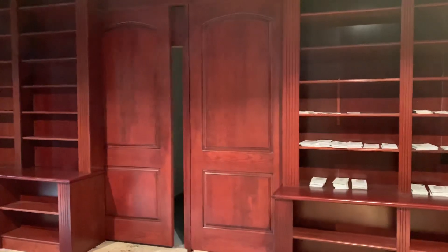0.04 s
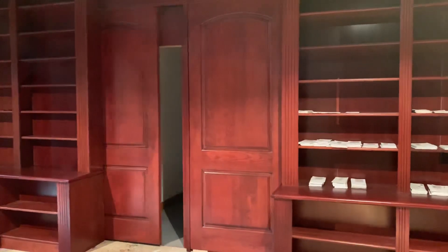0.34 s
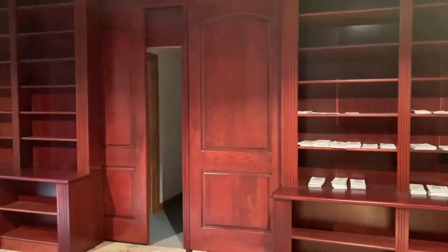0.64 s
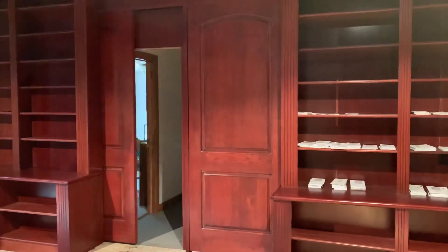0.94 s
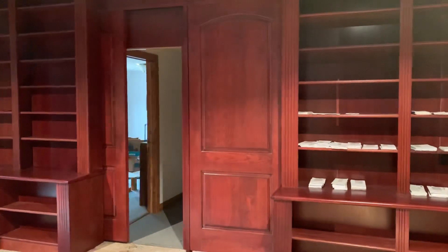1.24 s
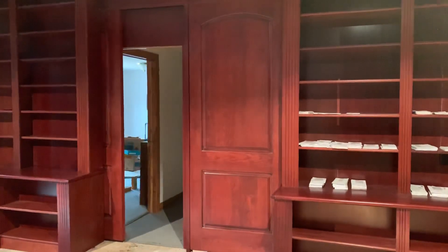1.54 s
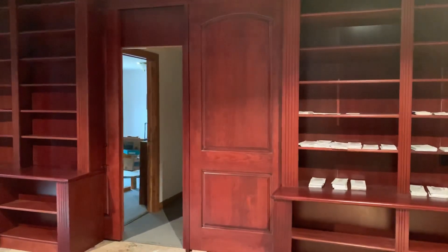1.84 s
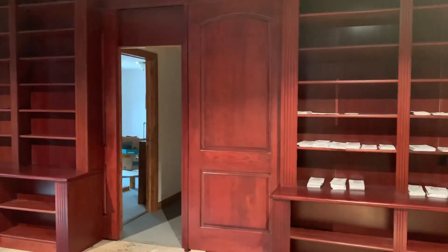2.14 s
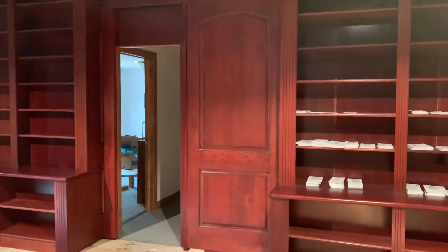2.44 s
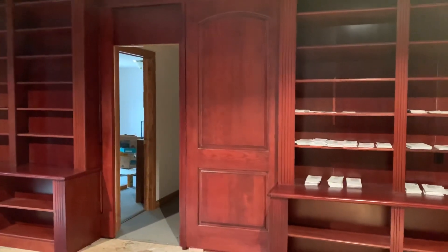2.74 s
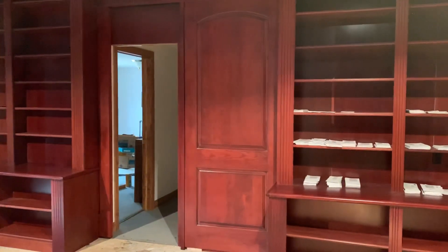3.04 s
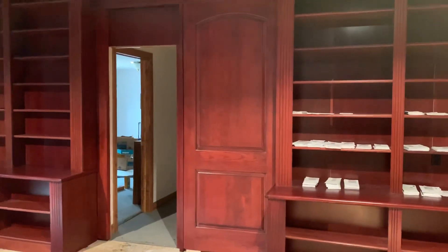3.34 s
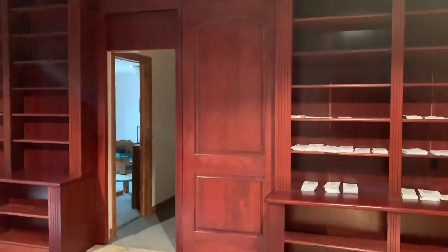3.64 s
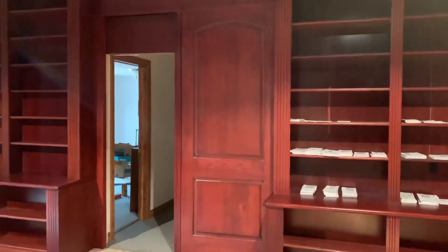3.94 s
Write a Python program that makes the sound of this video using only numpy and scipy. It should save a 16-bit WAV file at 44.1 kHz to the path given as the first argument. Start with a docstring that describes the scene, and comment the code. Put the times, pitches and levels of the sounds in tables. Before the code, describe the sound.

Indoors, a wooden door rolls open on a growling motor, with small bumps and a light scrape. The movement fades into a faint hum and moving air, and a soft thud with a slight rustle comes near the end.

```python
"""A motor slides a wooden door into its pocket in a panelled room. From the start the drive makes
the door and its cavity drone, while the rollers rush and jolt along the track and the door scrapes
its guide. It slows and stops after 1.7 s, leaving ventilation, mains hum and a thin hiss.
A faint rustle at 3.2 s leads into one soft thud at 3.4 s, like a footfall, and trails off after it."""
import sys
import numpy as np
from scipy import signal
from scipy.fft import rfft, irfft
from scipy.io import wavfile
from scipy.ndimage import uniform_filter1d

SR = 44100
rng = np.random.default_rng(int(sys.argv[2]) if len(sys.argv) > 2 else 0)


def wav_out(sig):
    """Save sig, one row per channel (or a flat mono array), as 16-bit PCM at SR to the path in sys.argv[1]."""
    wavfile.write(sys.argv[1], SR, np.round(np.clip(np.atleast_2d(sig).T, -1, 1) * 32767).astype(np.int16))


N = 176400
T, HZ = np.arange(N) / SR, np.fft.rfftfreq(N, 1 / SR)


def drive():
    """The motor growls under its load and shakes the door panel and the cavity behind it."""
    # drone, swelling with the load and dying as the door slows (time [s], level [dB], pitch [Hz])
    drone_curve = [(0, -27, 70.7), (.045, -26.5, 73), (.12, -37.5, 78), (.21, -29, 77.6),
                   (0.319, -35.5, 79.34), (.39, -28, 79.4), (0.471, -27, 86.5), (.52, -43.5, 90.6),
                   (.59, -39.5, 83), (0.669, -27, 82.1), (0.711, -34.5, 78.9), (.77, -29.5, 80),
                   (.81, -43.5, 82.7), (.88, -32, 85.2), (.96, -39, 83.9), (1.01, -31.5, 81.5),
                   (1.13, -43, 84.2), (1.2, -35.5, 83.4), (1.27, -48, 83), (1.33, -42.5, 82.7),
                   (1.41, -34, 87), (1.46, -48.5, 85.5), (1.51, -41, 86.2), (1.66, -45.5, 82),
                   (1.72, -68, 79), (1.8, -100, 78)]
    # resonances of door and cavity (pitch [Hz], width [Hz], relative level [dB], left lead [rad])
    cavity_modes = [(31.8, 6.3, -16.5, 0.52), (64, 8.4, -6, 1), (89, 9.2, -4, 0.84), (101, 11, -4.5, 0.41)]
    # the panel's boom, surging as the door gathers speed (time [s], level [dB])
    boom_curve = [(0, -24.5), (.075, -61), (.135, -44), (.19, -42), (.235, -38), (.3, -41.5), (.355, -28.5),
                  (.41, -42), (.45, -32), (.5, -28.5), (.54, -38.5), (.6, -34), (.71, -36), (.85, -35),
                  (.92, -31.5), (1.01, -45.5), (1.09, -37.5), (1.16, -36.5), (1.24, -52), (1.31, -37),
                  (1.42, -41.5), (1.6, -56), (1.8, -100)]
    # panel resonance (pitch [Hz], width [Hz], relative level [dB], left lead [rad])
    panel_modes = [(123.4, 13, 0, 1.5)]
    # the motor's growl (time [s], level [dB])
    growl_curve = [(0, -37), (.25, -33), (.34, -37), (.7, -40.5), (.95, -36.5), (1.2, -34), (1.4, -41),
                   (1.58, -53.5), (1.7, -67), (1.8, -100)]
    # motor resonances (pitch [Hz], width [Hz], relative level [dB], left lead [rad])
    growl_modes = [(155.3, 8.8, -5.5, 2.15), (180, 35, -5.5, 2.36), (191.8, 41, -6, 2.16),
                   (213, 14, -18.5, 4.8)]
    waver_hz, left_db, left_lead_rad = 3.2, -3.5, 0.55
    times, db, hz = np.transpose(drone_curve)
    pitch = np.interp(T, times, hz) + waver_hz * wander(N, size=1200)
    phase = 2 * np.pi * np.cumsum(pitch) / SR
    tone = unit(np.array([amp(left_db) * np.sin(phase + left_lead_rad), np.sin(phase)]))
    cavity = unit(ringing(cavity_modes, left_db=left_db))
    drone = amp(np.interp(T, times, db)) * (amp(-1.5) * tone + amp(-8.5) * cavity)
    boom = level(boom_curve) * ringing(panel_modes, steady=0.41)
    growl = level(growl_curve) * ringing(growl_modes, steady=0.67, left_db=-2.5)
    return drone + boom + growl


def rollers():
    """Wheels rush and rattle along the ringing track."""
    # rolling envelope (time [s], level [dB])
    roll_curve = [(0, -37.5), (.18, -35.5), (.4, -36.5), (.65, -34.5), (.95, -36.5), (1.18, -40),
                  (1.3, -45.5), (1.45, -54), (1.68, -64), (1.8, -100)]
    # rolling colour in the centre (frequency [Hz], relative level [dB])
    mid_colour = [(120, -33), (200, -6), (222, -5.5), (285, -1.5), (370, -1.5), (509, -6.5), (734, -6.5),
                  (832, -8.5), (1070, -14.5), (1180, -11.5), (1300, -20), (1780, -22), (3050, -41),
                  (3960, -63.5), (6710, -120)]
    # rolling colour at the sides (frequency [Hz], relative level [dB])
    side_colour = [(110, -24.5), (180, -7.5), (207, -1.5), (318, -14.5), (443, -16), (574, -15.5),
                   (737, -15.5), (922, -19.5), (1430, -24), (1630, -26.5), (2740, -41.5), (3050, -47),
                   (3960, -79.5), (6710, -120)]
    # track resonances (pitch [Hz], width [Hz], relative level [dB], left lead [rad])
    track_modes = [(263, 12, -15, -1.5), (295, 7, -13, 0), (327, 9, -13, 0), (361, 9, -15, .2),
                   (392, 16, -17, .2), (536, 6, -20, 0), (684, 6, -18, .3), (721, 4, -14.5, .4),
                   (1151, 10, -23, .5), (1210, 14, -27, .5), (1336, 6, -30, 1), (1765, 6, -28, 2),
                   (2725, 6, -39, 2), (4199, 6, -48, 1), (4312, 6, -50, 1)]
    wheels = rattle(rush(mid_colour, side_colour, side_db=-1, ripple_db=1.5))
    track = ringing(track_modes, steady=0.1)
    return (amp(1) * wheels + amp(-1) * track) * level(roll_curve) * balance(-1.5, -2.6)


def rattle(x, depth_db=2.0):
    """Uneven wheels stir one wooden resonance after another: patches about 150 Hz wide, 80 ms long."""
    spectrum = signal.stft(x, nperseg=1024, noverlap=768)[2]
    patches = uniform_filter1d(rng.standard_normal(spectrum.shape), size=4, axis=1)
    patches = unit(uniform_filter1d(patches[0], size=14, axis=1))  # one pattern for both channels
    return signal.istft(spectrum * amp(depth_db * patches), nperseg=1024, noverlap=768)[1][:, :N]


def jolts():
    """The rollers knock over uneven spots of the track."""
    # bumps (time [s], level [dB], pitch [Hz], 60 dB decay [s])
    bumps = [(.33, -29.5, 339.3, 0.21), (.405, -33.5, 165, .15), (.6, -34, 335, .17), (.655, -28, 376, .14),
             (.85, -36, 292, 0.24), (.92, -34.5, 366.6, 0.24), (1.065, -31.5, 270, 0.2),
             (1.175, -33, 359, 0.2), (1.37, -37.5, 290, 0.19)]
    return knocks(bumps, rise_s=0.0033, room_db=-6.5)


def scrape(slips_per_s=3400):
    """The door drags along its guide in dense tiny slips, with a few longer rubs."""
    # scraping envelope (time [s], level [dB])
    scrape_curve = [(0, -57), (.25, -63), (.42, -59.5), (.55, -58.5), (.66, -57), (.78, -59), (1, -62),
                    (1.25, -70), (1.6, -92), (1.8, -110)]
    # bright colour of the slips (frequency [Hz], relative level [dB])
    slip_colour = [(500, -34), (1600, -1), (2600, -6), (3300, -6.5), (4300, -8.5), (6500, -15), (8500, -43),
                   (12000, -29.5), (16000, -49.5)]
    # rubs on the guide (peak time [s], level [dB], band centre [Hz], half length [s])
    rubs = [(.46, -68, 4300, 0.1), (.56, -78, 6740, 0.037), (.658, -51.5, 2600, 0.032),
            (.66, -80, 6500, 0.033)]
    slips = (rng.random((2, N)) < slips_per_s / SR) * rng.choice([-1, 1], (2, N))
    grit = unit(colour(slips, slip_colour))
    return level(scrape_curve) * grit * balance(-.6, .6) + swishes(rubs)


def footfall(tick_half_s=.0032):
    """Soft contacts sink in pitch as the weight lands, with two faint ticks and a scuff of the sole."""
    # contacts of the thud (time [s], level [dB], pitch [Hz], 60 dB decay [s])
    contacts = [(3.416, -26.5, 276, 0.066), (3.429, -28.5, 169.4, 0.3), (3.44, -38.5, 88.6, 0.84),
                (3.457, -25.5, 245, 0.11), (3.481, -31.5, 63, 0.27), (3.535, -38, 70, 0.25)]
    # ticks on the attack (peak time [s], level [dB], band centre [Hz])
    tick_bursts = [(3.421, -76, 12900), (3.425, -71, 9500)]
    # scuffs of the sole (peak time [s], level [dB], band centre [Hz], half length [s])
    scuffs = [(3.45, -44, 300, .035), (3.51, -47, 220, 0.041)]
    ticks = np.zeros(N)
    for peak, db, hz in tick_bursts:
        fizz = unit(colour(rng.standard_normal(N), [(hz / 2, -10), (hz, 0), (hz * 2, -15)]))
        ticks += amp(db) * fizz * np.exp(-((T - peak) / tick_half_s) ** 2)
    thud = knocks(contacts, rise_s=0.005, room_db=-10.5) * balance(-.7, .7)
    return ticks + thud + swishes(scuffs)


def rustle():
    """Faint friction, like clothing, around the footfall."""
    # brushes (peak time [s], level [dB], band centre [Hz], half length [s])
    brushes = [(3.225, -71, 4630, 0.029), (3.26, -64, 2020, 0.032), (3.43, -73, 5400, .025),
               (3.45, -56.5, 1190, 0.055), (3.62, -75.5, 5400, 0.15)]
    return swishes(brushes)


def ventilation():
    """A bed of moving air carries fan and duct tones and a whirr that swells and fades."""
    # air colour in the centre (frequency [Hz], relative level [dB])
    mid_colour = [(15, -38), (35, -14.5), (50, 3), (75, -2.5), (150, 0.3), (260, -1.6), (350, -1),
                  (520, -6), (750, -4.5), (900, -4), (1020, -9.5), (1180, -12.5), (1400, -7.5), (1650, -18),
                  (2250, -20), (2800, -26.5), (3500, -40), (4500, -62), (7000, -110)]
    # air colour at the sides (frequency [Hz], relative level [dB])
    side_colour = [(15, -35), (35, -18), (55, -5.5), (150, -12), (260, -8.5), (400, -8.5), (750, -5),
                   (900, -3), (1020, -9.5), (1450, -8.5), (1750, -11.5), (2250, -27.5), (2800, -21.5),
                   (3500, -31), (4500, -61), (7000, -110)]
    # fan and duct tones (pitch [Hz], width [Hz], level [dB], left lead [rad])
    fan_modes = [(50, 5, -60.5, 0), (169, 5, -68, 0), (199, 3, -58.5, 0), (319, 6, -63, -.2),
                 (393, 5, -64.5, -.4), (472, 6, -67, -1), (548, 6, -65.5, -1), (1012, 5, -71, -1.2),
                 (1184, 6, -72, -1.4), (1336, 7, -67, -1.6), (1415, 30, -66, -1.8), (3250, 40, -85, -1.5)]
    # the fan's whirr (pitch [Hz], width [Hz], level [dB], left lead [rad])
    whirr_modes = [(844.6, 9, -63, -1), (880, 5, -59.5, -1.17), (911, 24, -71.5, -1.9)]
    # swell of the whirr (time [s], gain [dB])
    whirr_curve = [(0, 2), (1.6, -1.5), (1.66, -11), (1.85, 0.5), (2.1, 3), (2.22, -7), (2.45, 0),
                   (2.8, -2), (2.97, 3), (3.15, -5), (3.42, 3), (3.7, -2), (3.78, 8.5), (3.86, -2), (4, -8)]
    air = amp(-49.5) * rush(mid_colour, side_colour, side_db=-3, ripple_db=3)
    fan = ringing(fan_modes, steady=0.18)
    whirr = level(whirr_curve) * ringing(whirr_modes, steady=0.64)
    return air + fan + whirr


def mains_hum(mains_hz=60, waver_db=1.1):
    """Even harmonics of the mains waver slightly in level."""
    # hum partials (harmonic [number], left level [dB], right level [dB])
    partials = [(2, -54, -48.5), (4, -68, -56.5), (6, -63, -60)]
    hum = np.zeros((2, N))
    for harmonic, left_db, right_db in partials:
        phase = 2 * np.pi * (harmonic * mains_hz * T + rng.random())
        hum += balance(left_db, right_db) * np.sqrt(2) * np.sin(phase)
    return hum * amp(waver_db * wander(N, size=5000))


def hiss():
    """Wide, faint hiss of the vents over the microphone's own mono noise."""
    # vent hiss (frequency [Hz], relative level [dB])
    vent_colour = [(1500, -20.5), (2800, -8), (3300, -0.5), (4300, 0), (5100, 0), (5900, -10), (7000, -9.5),
                   (8500, -33.5), (15000, -17.5)]
    # microphone noise (frequency [Hz], relative level [dB])
    mic_colour = [(3000, 2.5), (7000, -4.5), (8500, 2.5), (10000, 27), (12000, 24), (13500, -3.5),
                  (15500, -10.5)]
    vents = amp(-73) * unit(colour(rng.standard_normal((2, N)), vent_colour))
    mic_noise = amp(-90) * unit(colour(rng.standard_normal(N), mic_colour))
    return (vents + mic_noise) * balance(-.8, .8)


def ringing(modes, steady=0, left_db=0):
    """Resonances under a random force; steady, from 0 to 1, evens out their beating."""
    out = np.zeros((2, N))
    for hz, width, db, lead in modes:
        force = rng.standard_normal((len(HZ), 2)) @ [1, 1j]
        ring = np.fft.ifft(force / (1 + ((HZ - hz) / width * 1.48) ** 2), N)
        ring = amp(db) * unit(ring / abs(ring) ** steady) * np.sqrt(2)
        out += [(ring * np.exp(1j * lead)).real, ring.real]
    return out * balance(left_db / 2, -left_db / 2)


def rush(mid_colour, side_colour, side_db, ripple_db):
    """Stereo noise, rippled in frequency by the room's standing waves."""
    def layer(points):
        spectrum = rfft(rng.standard_normal(N))
        ripple = amp(ripple_db * wander(len(HZ), size=40))
        return unit(colour(irfft(spectrum * ripple, N), points))
    mid, side = layer(mid_colour), amp(side_db) * layer(side_colour)
    return np.array([mid + side, mid - side])


def knocks(rows, rise_s, room_db, room_t60_s=.5):
    """Soft contacts ring briefly in the wood; the room answers."""
    knock = np.zeros(N)
    for start, db, hz, t60 in rows:
        age = np.maximum(T - start, 0)
        envelope = amp(db - 60 * age / t60) * (1 - np.exp(-age / rise_s))
        knock += envelope * np.sin(2 * np.pi * hz * age)
    tail = rng.standard_normal((2, SR // 2)) * amp(-60 * T[:SR // 2] / room_t60_s)
    reverb = signal.fftconvolve(knock[None], tail / np.linalg.norm(tail[0]), axes=1)[:, :N]
    return knock + amp(room_db) * reverb


def swishes(rows, skirt_db=21.5):
    """Short bands of friction noise swell and fade."""
    out = np.zeros((2, N))
    for peak, db, hz, half_s in rows:
        band = [(hz / 2, -skirt_db), (hz, 0), (hz * 2, -skirt_db * 2), (hz * 4, -skirt_db * 4)]
        friction = unit(colour(rng.standard_normal((2, N)), band))
        out += amp(db) * friction * np.exp(-((T - peak) / half_s) ** 2)
    return out


def amp(db):
    """Decibels to gain."""
    return 10 ** (np.asarray(db) / 20)


def balance(left_db, right_db):
    """A gain for each channel."""
    return amp([[left_db], [right_db]])


def unit(x):
    """Scales to an rms of 1."""
    return x / np.sqrt(np.mean(abs(x) ** 2) + 1e-20)


def level(points):
    """Fader curve through (time [s], level [dB]) points."""
    return amp(np.interp(T, *np.transpose(points)))


def colour(x, points):
    """Equaliser through (frequency [Hz], gain [dB]) points."""
    hz, db = np.transpose(points)
    return irfft(rfft(x) * amp(np.interp(np.log(HZ + 1), np.log(hz + 1), db)), N)


def wander(count, size):
    """Smooth random drift that changes over size steps."""
    return unit(uniform_filter1d(uniform_filter1d(rng.standard_normal(count), size), size))


def scene():
    """The door, the footfall and the room tone together."""
    door = drive() + rollers() + jolts() + scrape()
    return door + footfall() + rustle() + ventilation() + mains_hum() + hiss()


def record(dry, cutoff_hz=15700):
    """A steep low-pass trims the very top."""
    lowpass = signal.firwin(511, cutoff_hz, window=("kaiser", 9), fs=SR)
    return signal.oaconvolve(dry, lowpass[None], "same")


dry = scene()
out = record(dry)
wav_out(out)
```